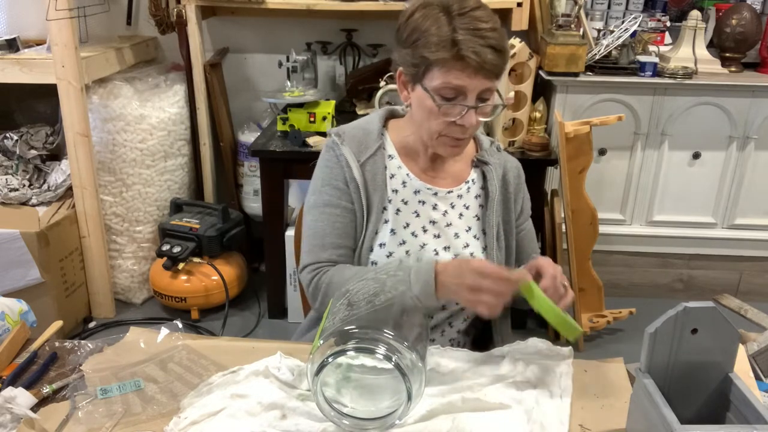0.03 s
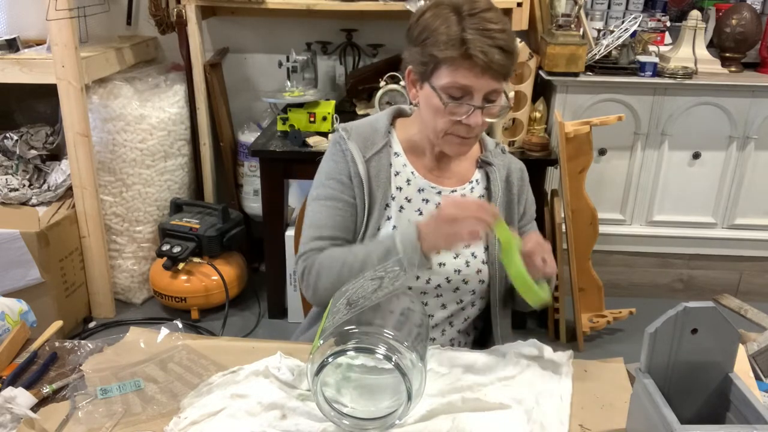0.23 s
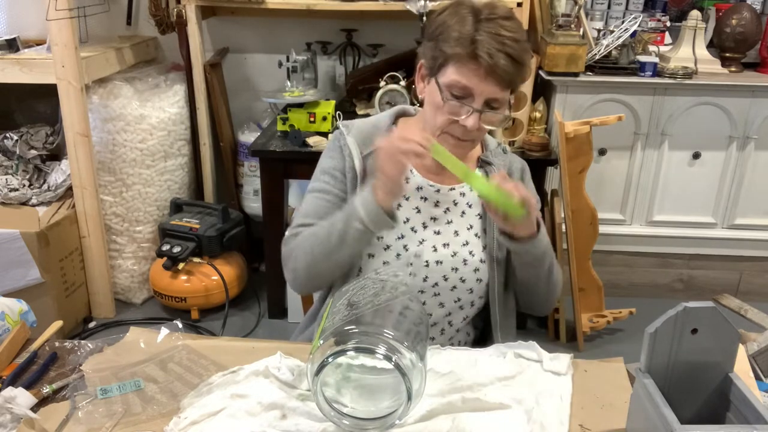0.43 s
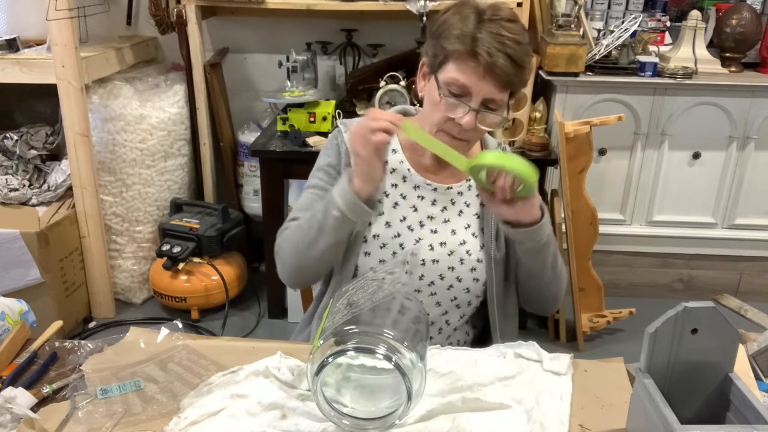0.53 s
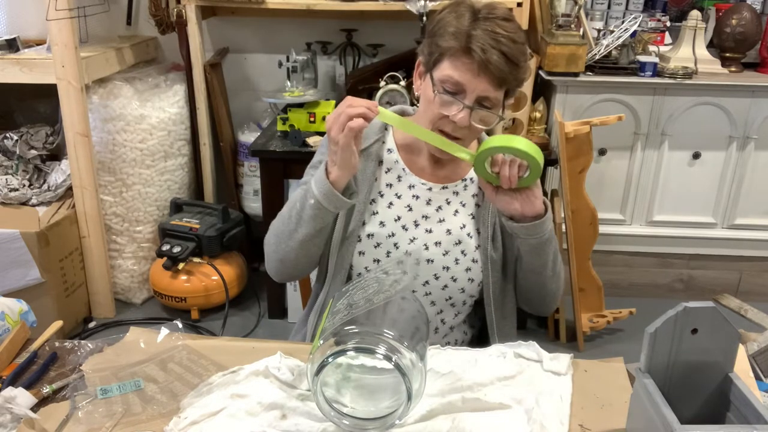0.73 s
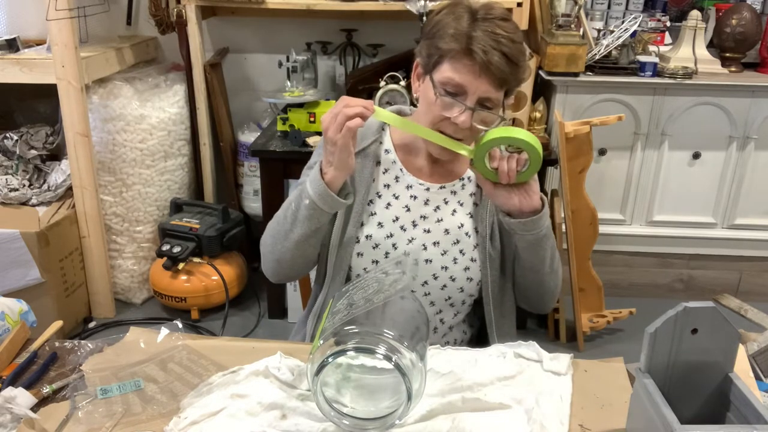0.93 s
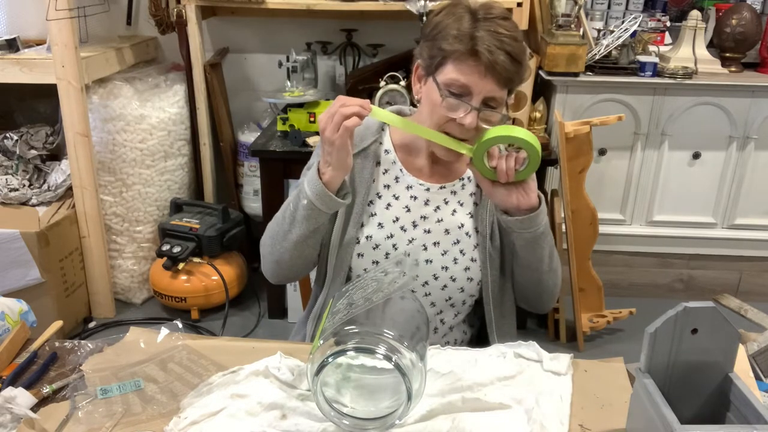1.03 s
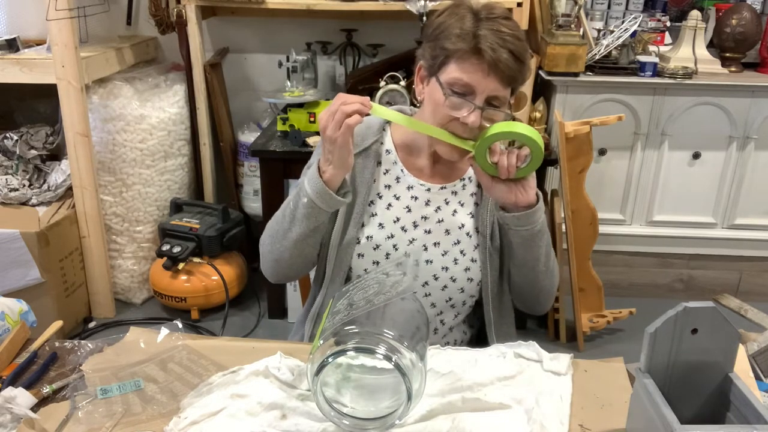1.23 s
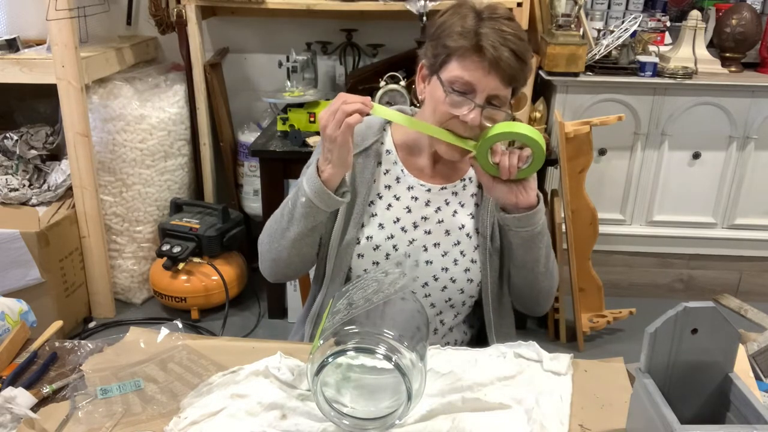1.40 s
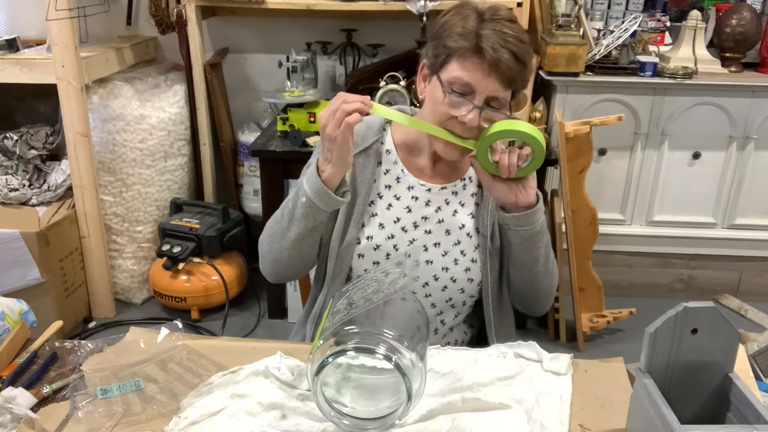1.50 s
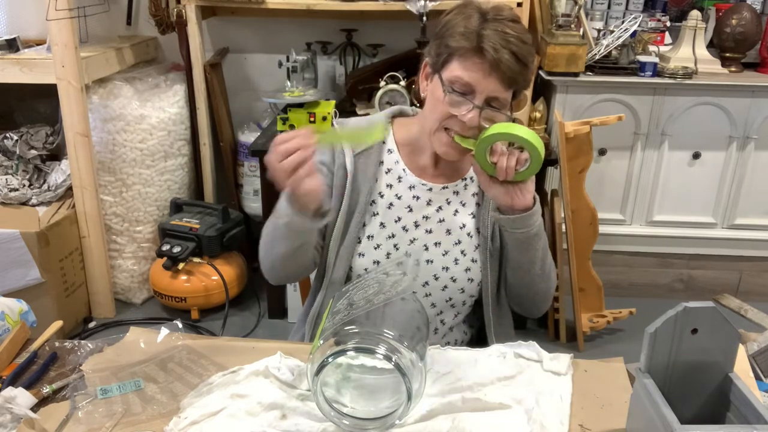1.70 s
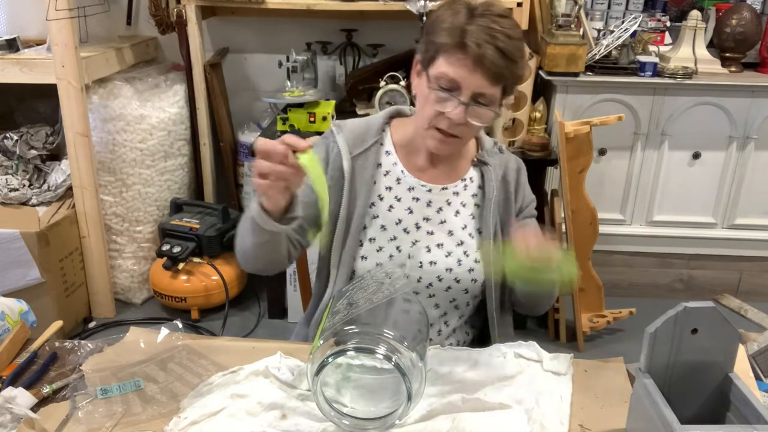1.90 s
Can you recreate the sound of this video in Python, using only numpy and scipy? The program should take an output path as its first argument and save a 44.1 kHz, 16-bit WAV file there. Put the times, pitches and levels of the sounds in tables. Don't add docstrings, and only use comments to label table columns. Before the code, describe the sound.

A strip of sticky paper tape peels with a quick jerky rip, later a small tearing click

```python
import sys
import numpy as np
from scipy import signal
from scipy.fft import rfft, irfft
from scipy.io import wavfile
from scipy.ndimage import uniform_filter1d

SR = 44100
rng = np.random.default_rng(int(sys.argv[2]) if len(sys.argv) > 2 else 0)


def unload_wav(signal):
    wavfile.write(
        sys.argv[1],
        SR,
        np.round(np.clip(np.atleast_2d(signal).T, -1, 1) * 32767).astype(np.int16),
    )


def voltage_ratio(level):
    return 10 ** (np.asarray(level, float) / 20)


N = 85995

# start_s, peak_db, brightness_db_per_octave,
# drum_db
PEEL_CRACKS = [(.3219, -38, 7, -39), (.3253, -13, 0.5, -25), (.3369, -9.5, -0.5, -37),
               (.3402, -13, 2.5, -23), (.3427, -9, 2.5, -33.5), (.3460, -15, 6.5, -21),
               (.3510, -32, 10, -28), (.3819, -22, 1, -22), (.3859, -13, 2.5, -20.5),
               (.3887, -12, 3.5, -37), (.3914, -15, 9.5, -37.5), (.3948, -22, 3, -22), (.3960, -18, 5, -14),
               (.4247, -19.5, 9, -13.5), (.4273, -16, 5, -18.5), (.4314, -22.5, 3.5, -18),
               (.4322, -27, 2, -28), (.4356, -15.5, 1.5, -19), (.4385, -12, 1.5, -30),
               (.4406, -15.5, -0.5, -16), (.4602, -29, -7.5, -25), (.4626, -21.5, 0.5, -13.5),
               (.4669, -26, -4, -32), (.4687, -19, 2, -27.5), (.4713, -15, 10, -12), (.4737, -17, -3, -28),
               (.4765, -25.5, -5, -17),
               (0.4937, -33, 5, -30), (0.4966, -20.5, -3.5, -34), (.4974, -22, -1.5, -10),
               (.5050, -29, -3.5, -13), (0.516, -29, -3, -23.5), (0.5175, -24.5, -7.5, -25),
               (0.5202, -31, 4, -19), (.5246, -32, -3, -25), (0.5281, -17, 5, -34.5),
               (0.5342, -16.5, -1.5, -27), (.5380, -21, 2, -31), (0.5409, -21.5, -4.5, -15),
               (0.5444, -32, -1, -12), (.5509, -26, -5, -20), (0.5548, -21, 4, -22), (.5590, -22, 5, -27),
               (0.5635, -23, -4.5, -23), (0.5665, -31, -4.5, -24), (0.5715, -29, -6, -10),
               (0.572, -27, 1, -15), (0.5762, -21, 9, -30), (.5858, -26, 25, -36), (0.5898, -26, 12, -7),
               (0.5995, -20, 3, -15), (0.6049, -20.5, 11, -16), (0.6088, -25, 3, -31),
               (0.6113, -24.5, 9, -16.5), (.6159, -16.5, 4, -19), (0.618, -17, 17.5, -20),
               (0.6245, -24, 16, -14), (.6255, -19, 8.5, -21), (.6282, -20, 0, -6), (.6342, -21.5, -6, -25)]
# start_s, peak_db, brightness_db_per_octave, drum_db
TEAR_CRACKS = [(1.009, -49.5, 1, -27.5), (1.0545, -53, 2, -35), (1.2814, -44.5, 16, -14),
               (1.2885, -61, 8, -24), (1.5818, -47, 1, -42), (1.5910, -59, 4, -36.5),
               (1.6044, -16.5, 1.5, -19.5), (1.6070, -17, 2, -14.5), (1.6092, -23, 0, -20),
               (1.6106, -24.5, 5, -26), (1.6118, -18, 4, -15), (1.7922, -43, 0, -42)]
# start_s, length_s, level_db, drum_db
PEEL_SLIPS = [(0.3, 0.026, -57, -35), (0.334, 0.018, -29.5, -17), (0.387, 0.011187, -28.5, -19),
              (0.425, 0.0208, -31.5, -32.5), (0.459, 0.024, -33, -16), (0.49, 0.02, -33, -20),
              (0.512, 0.037, -32.5, -7), (0.549, 0.025727, -39.5, -1), (0.567, 0.028, -35, -8),
              (0.6, 0.016, -39, -8.5), (.611, 0.029948, -36, -4), (1.6036, 0.012, -32.5, -15.5),
              (0.96, 0.14, -70.5, -22), (0.18, 0.1, -67.5, -16.5), (1.047, 0.012, -70, -23)]
# frequency_hz, level_db
PAPER_COLOUR = [(350, -35.5), (600, -13.5), (2150, -3), (2400, -1), (2830, -4), (5400, -0.5), (7730, -4),
                (12800, -7.5), (16000, -12.5)]
# frequency_hz, width_hz, level_db
STRIP_MODES = [(278, 110, -4.5), (478, 166, -4.5), (626, 126, 2), (684, 182, 1.5), (1250, 470, -5),
               (1936, 600, -3)]
# frequency_hz, level_db
SHORT_STRIP_COLOUR = [(500, 3), (1500, 2.5), (2450, 0), (3200, 2.5), (4300, 3), (5400, -1), (7200, 4.5),
                      (11000, 0)]
# frequency_hz, level_db
LONG_STRIP_COLOUR = [(500, 1), (1300, -1), (2100, 0.5), (2900, 2), (3800, 2), (5000, -3.5), (7200, 4),
                     (11000, 0)]
# frequency_hz, level_db
TORN_STRIP_COLOUR = [(300, 0.5), (420, -8.5), (650, 1.5), (1150, -5), (1750, 2.5), (4300, -4.5), (7300, 7),
                     (11000, 0)]
# start_s, length_s, pitch_hz, level_db
STRIP_HUMS = [(.3365, 0.011, 2400, -33.5), (.465, .04, 269, -50), (.528, .04, 619, -38.5),
              (.575, .027, 529, -41), (.608, .034, 728, -41.5), (.612, 0.027, 489.3, -41.5),
              (1.282, 0.015, 1006, -66), (1.604, 0.011, 610.3, -44), (1.604, 0.0077, 710, -50.5),
              (1.604, 0.012, 2440, -48.5), (0.3243, 0.0039, 2450, -34), (.336, 0.02243, 513, -44.5),
              (0.309, 0.008, 6500, -51), (1.595, 0.0082, 2500, -59), (1.601, 0.0083, 3250, -46),
              (1.604, 0.008202, 5400, -55), (0.461, 0.017, 1959, -38.5), (0.554, 0.0069, 1951, -45),
              (.576, .012, 3780, -40), (0.631, 0.0063, 3730, -36.5), (1.281, .006, 3440, -65),
              (1.28, 0.00768, 1840, -64)]
# start_s, peak_db, brightness_db_per_octave, drum_db
NAIL_CLICKS = [
    (.1585, -16.5, 0.5, -47),
    (.1654, -30.5, 13, -47),
    (.1716, -29.5, 14.5, -45),
]
# frequency_hz, level_db
NAIL_COLOUR = [(1000, -7.5), (3500, -12), (5300, 1), (6300, 1.5), (8000, 6.5), (11000, 0.5), (16000, 3.5)]
# pitch_hz, t60_s, level_db
ROLL_MODES = [(396, 0.042, 3), (1250, 0.013796, 8), (1700, .02, -1)]
# frequency_hz, width_hz, level_db
CORE_MODES = [(534.55, 250, -1), (1001.6, 110, 2), (1400, 110, -1), (1690, 145, 4), (2270, 1330.7, -12),
              (4150, 300, -8), (4960, 180, -1), (6960, 1300, -10)]
# frequency_hz, t60_s
ROOM_DECAY = [(250, 0.37), (660, 0.47545), (1740, 0.79), (4590, 0.78), (8000, 0.56), (13000, 0.35)]
# frequency_hz, level_db
ROOM_COLOUR = [(200, 5), (1000, 0), (4000, -1), (8000, -0.5), (14000, 7.5)]
# frequency_hz, level_db
BUMP_SPECTRUM = [(88, -42), (150, -2.5), (1440, -3), (2010, -21), (2440, -26), (3460, -29), (5000, -27),
                 (6500, -54), (11000, -120)]
# frequency_hz, level_db
AIR_SPECTRUM = [(12, -63), (20, -32.5), (86, -1), (206, -8), (281, -10), (616, -13.5), (2060, -24.5),
                (14300, -31), (16500, -34)]

CRACK_T60_S, CRACK_TAIL_DB = 0.006, -13
TICK_T60_S, TICKS_PER_S, TICK_SPREAD_DB = 0.0015, 5000, 2
SLIP_SKEW, DRUM_SKEW, SLIP_EDGE = 1, 0.84, 0.51
PULL_FROM_S, TEAR_FROM_S = 0.486, 1.5
HUM_SHARPNESS = 8.3
PICK_S, PICK_DB = 0.1595, -44
RUB_START_S, RUB_LENGTH_S, RUB_RELEASE_S = 0.0535, 0.1, 0.026
RUB_DB, RUB_FADE_DB, RUB_HISS_DB = -52.5, -8, -15
THUD_S, THUD_LENGTH_S, THUD_DB, THUD_HZ = 0.541, 0.12, -58.5, 148
EARLY_DB, EARLY_T60_S = -8, 0.025
ROOM_DB, ROOM_DELAY_S, ROOM_TURNS_PER_S = -13.5, 0.0035, 45
BUMP_DB, BUMP_T60_S = -54.5, 0.78
AIR_DB = -65
MICROPHONE_EDGE_HZ = 15900


def evened(x):
    return x / np.sqrt(np.mean(x ** 2) + 1e-20)


def read(points, hz):
    f, value = np.transpose(points)
    return np.interp(np.log(hz + 1), np.log(f + 1), value)


def colour(x, points, tilt_db=0.):
    hz = abs(np.fft.fftfreq(2048, 1 / SR))
    octaves = np.log2(np.clip(hz, 200, 7000) / 5000)
    db = read([(0.93, -67)] + list(points), hz) + tilt_db * octaves
    spectrum = np.conj(np.exp(signal.hilbert(db * np.log(10) / 20)))
    taps = np.fft.ifft(spectrum).real
    return signal.oaconvolve(x, taps[:1024])[:len(x)]


def ring(x, modes):
    out = 0
    for k, (hz, width_hz, db) in enumerate(modes):
        b, a = signal.iirpeak(hz, hz / width_hz / 1.55, SR)
        twice = signal.lfilter(b, a, signal.lfilter(b, a, x))
        out = out + (-1) ** k * voltage_ratio(db) * twice
    return out


def add(mix, s, sound):
    part = mix[round(s * SR):][:len(sound)]
    part += sound[:len(part)]


def cracks(table):
    out, t = np.zeros(N), np.arange(1500) / SR
    noises = rng.standard_normal((len(table), 1500))
    for (start_s, peak_db, tilt_db, drum_db), noise in zip(table, noises):
        burst = voltage_ratio(CRACK_TAIL_DB - 60 * t / CRACK_T60_S) * noise
        burst[0] = 1
        bright = colour(burst, PAPER_COLOUR, tilt_db)
        drum = ring(burst, STRIP_MODES)
        crack = bright / abs(bright).max() + voltage_ratio(drum_db) * drum / abs(drum).max()
        add(out, start_s - 0.0002, voltage_ratio(peak_db) * crack)
    return out


def glue_ticks():
    size = voltage_ratio(TICK_SPREAD_DB * np.minimum(rng.exponential(1, N), 3))
    ticks = size * (rng.random(N) < TICKS_PER_S / SR)
    kind, t = rng.integers(0, 40, N), np.arange(200) / SR
    out = np.zeros(N)
    for k, noise in enumerate(rng.standard_normal((40, 200))):
        grain = noise * voltage_ratio(-60 * t / TICK_T60_S / (1 + k % 4))
        out += signal.oaconvolve(ticks * (kind == k), grain)[:N]
    return evened(out)


def rasp():
    t, bright, drum = np.arange(N) / SR, np.zeros(N), np.zeros(N)
    for start_s, length_s, db, drum_db in PEEL_SLIPS:
        u = np.clip((t - start_s) / length_s, 0, 1)
        bright += voltage_ratio(db) * abs(np.sin(np.pi * u ** SLIP_SKEW)) ** SLIP_EDGE * (u < 1)
        drum += voltage_ratio(db + drum_db) * abs(np.sin(np.pi * u ** DRUM_SKEW)) ** SLIP_EDGE * (u < 1)
    grains = glue_ticks()
    paper = colour(grains * bright, PAPER_COLOUR) / np.std(colour(grains, PAPER_COLOUR))
    strip = ring(grains[::-1] * drum, STRIP_MODES) / np.std(ring(grains, STRIP_MODES))
    return paper + strip


def peeled_tape():
    tape = cracks(PEEL_CRACKS + TEAR_CRACKS) + rasp()
    stage = np.digitize(np.arange(N) / SR, [PULL_FROM_S, TEAR_FROM_S])
    colours = SHORT_STRIP_COLOUR, LONG_STRIP_COLOUR, TORN_STRIP_COLOUR
    return sum(colour(tape * (stage == k), points) for k, points in enumerate(colours))


def strip_hums():
    out = np.zeros(N)
    noises = rng.standard_normal((len(STRIP_HUMS), 6000))
    for (start_s, length_s, hz, db), noise in zip(STRIP_HUMS, noises):
        size = round(length_s * SR)
        tone = ring(noise, [(hz, hz / HUM_SHARPNESS, 0)])[-size:]
        swell = np.sin(np.pi * np.arange(size) / size)
        add(out, start_s, voltage_ratio(db) * evened(tone) * swell)
    return out


def nail_tap():
    out, t = np.zeros(N), np.arange(5000) / SR
    tone = 0
    for hz, t60_s, db in ROLL_MODES:
        tone = tone + voltage_ratio(PICK_DB + db - 60 * t / t60_s) * np.sin(2 * np.pi * hz * t)
    add(out, PICK_S, np.minimum(t / 0.0014, 1) * tone)
    return out


def core_rub():
    t = np.arange(0, RUB_LENGTH_S, 1 / SR)
    friction = rng.standard_normal(len(t))
    flutter = evened(uniform_filter1d(rng.standard_normal(len(t)), size=200))
    noise = friction * voltage_ratio(2 * flutter)
    hiss = evened(colour(noise, [(500, -2.5), (2000, -19), (7000, 5.5), (16000, -7)]))
    body = evened(ring(noise, CORE_MODES)) + voltage_ratio(RUB_HISS_DB) * hiss
    shape = np.minimum(t / 0.0012, 1) * np.minimum((RUB_LENGTH_S - t) / RUB_RELEASE_S, 1)
    out = np.zeros(N)
    add(out, RUB_START_S, body * shape * voltage_ratio(RUB_DB + RUB_FADE_DB * (t / RUB_LENGTH_S) ** 2))
    return out


def roll_thud():
    t = np.arange(N) / SR
    shape = np.sin(np.pi * np.clip((t - THUD_S) / THUD_LENGTH_S, 0, 1))
    return voltage_ratio(THUD_DB) * shape * evened(ring(rng.standard_normal(N), [(THUD_HZ, 50, 0)]))


def room_response():
    s, taps = np.arange(SR) / SR, np.zeros(SR)
    at = np.arange(0, SR - 20, 20) + rng.integers(0, 20, (SR - 1) // 20)
    taps[at] = rng.choice([-1., 1.], at.shape)
    hz, t, z = signal.stft(taps, SR, nperseg=256)
    decay = voltage_ratio(-60 * t / read(ROOM_DECAY, hz)[:, None])
    tail = signal.istft(z * decay, SR, nperseg=256)[1][:SR]
    early = taps * voltage_ratio(-60 * s / EARLY_T60_S)
    both = voltage_ratio(ROOM_DB) * tail / np.linalg.norm(tail) + voltage_ratio(EARLY_DB) * early / np.linalg.norm(early)
    return both * np.clip(s / ROOM_DELAY_S - 1, 0, 1)


def room(x):
    out, turns = np.zeros(N), ROOM_TURNS_PER_S * np.arange(N) / SR
    for k in range(3):
        share = np.sqrt(2 / 3) * np.cos(2 * np.pi * (turns + k / 3))
        out += signal.fftconvolve(x * share, room_response())[:N]
    return colour(out, ROOM_COLOUR)


def noise_of(points):
    spectrum = rfft(rng.standard_normal(N)) * voltage_ratio(read(points, np.fft.rfftfreq(N, 1 / SR)))
    return evened(irfft(spectrum, N))


def earlier_bump():
    return voltage_ratio(BUMP_DB - 60 * np.arange(N) / SR / BUMP_T60_S) * noise_of(BUMP_SPECTRUM)


def room_air():
    return voltage_ratio(AIR_DB) * noise_of(AIR_SPECTRUM)


def scene():
    nail = colour(cracks(NAIL_CLICKS), NAIL_COLOUR) + nail_tap()
    near = peeled_tape() + strip_hums() + nail + core_rub() + roll_thud()
    return (near + room(near) + earlier_bump() + room_air())[None]


def band_limit(x):
    return signal.sosfilt(signal.butter(12, 16990, fs=SR, output="sos"), x)


def record(dry):
    taps = signal.firwin(255, MICROPHONE_EDGE_HZ, window=("kaiser", 3.0), fs=SR)
    mix = signal.oaconvolve(dry, taps[None], "same")
    return band_limit(mix)


dry = scene()
out = record(dry)
unload_wav(out)
```